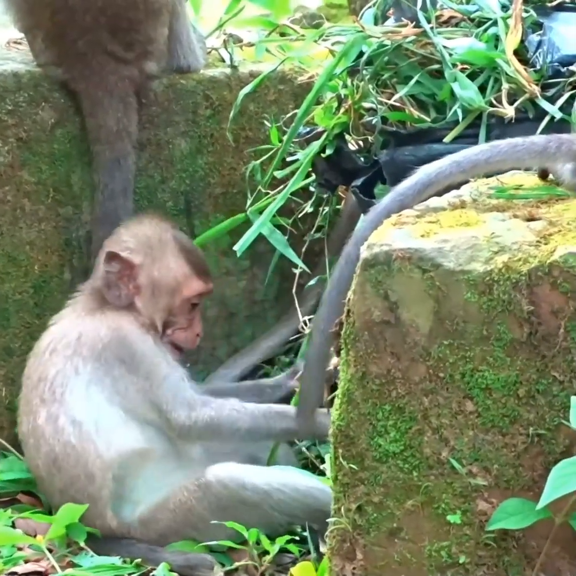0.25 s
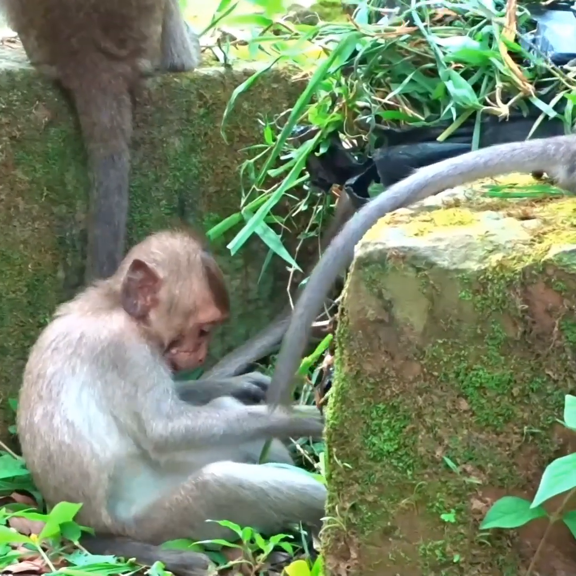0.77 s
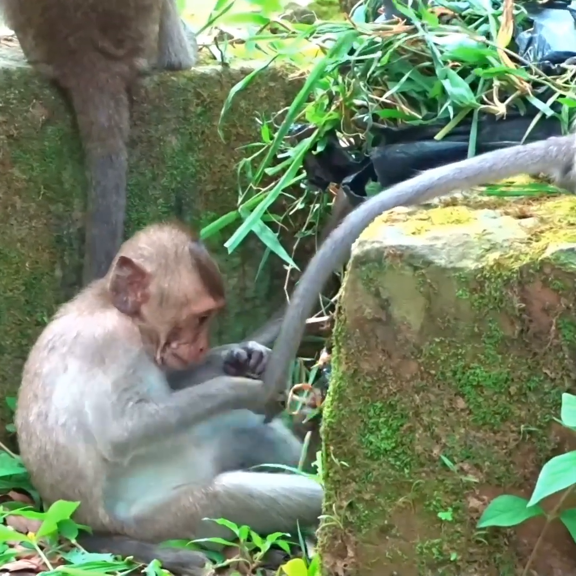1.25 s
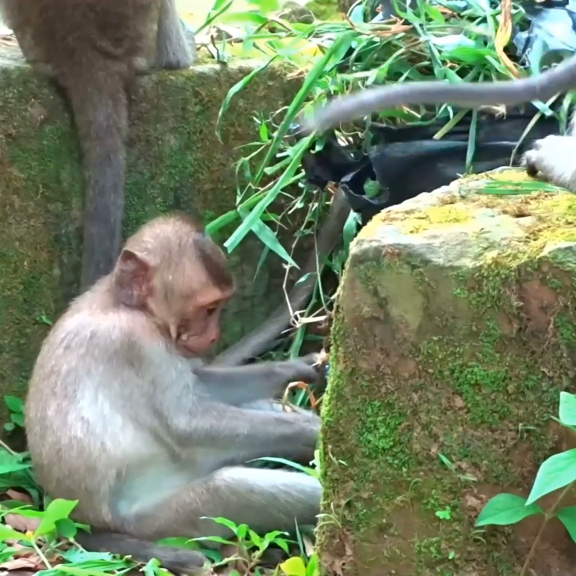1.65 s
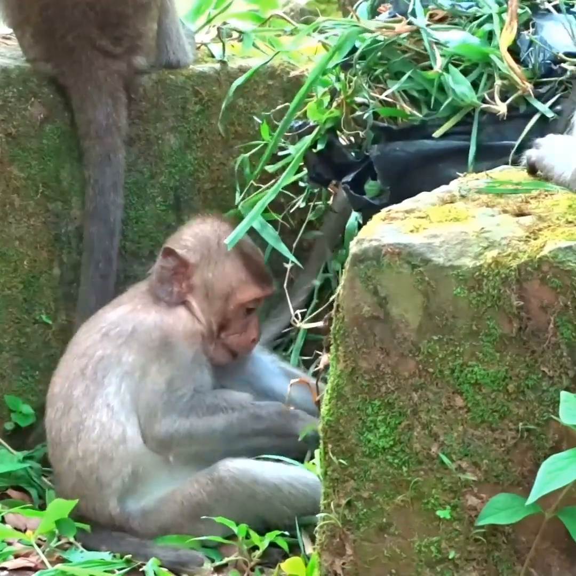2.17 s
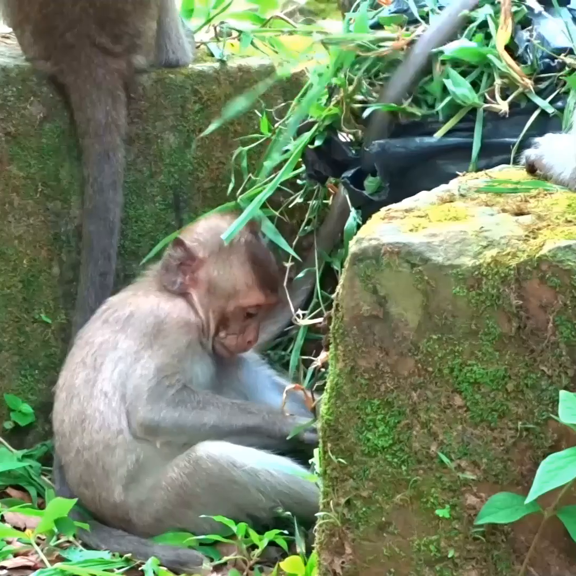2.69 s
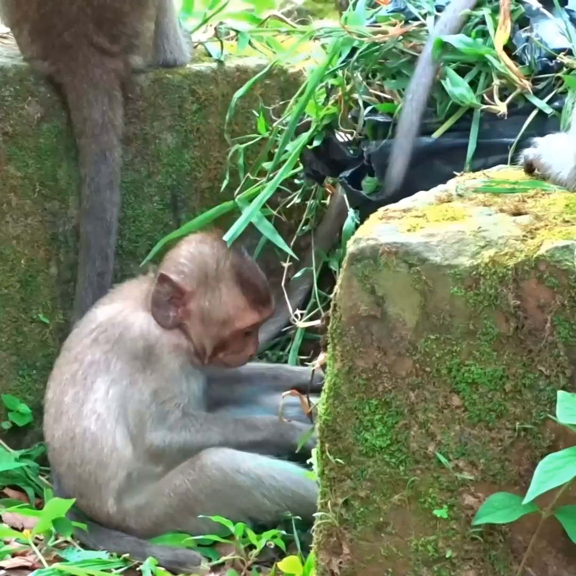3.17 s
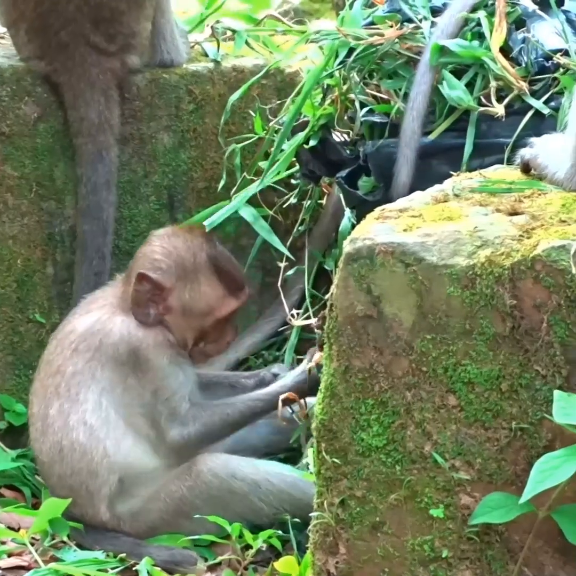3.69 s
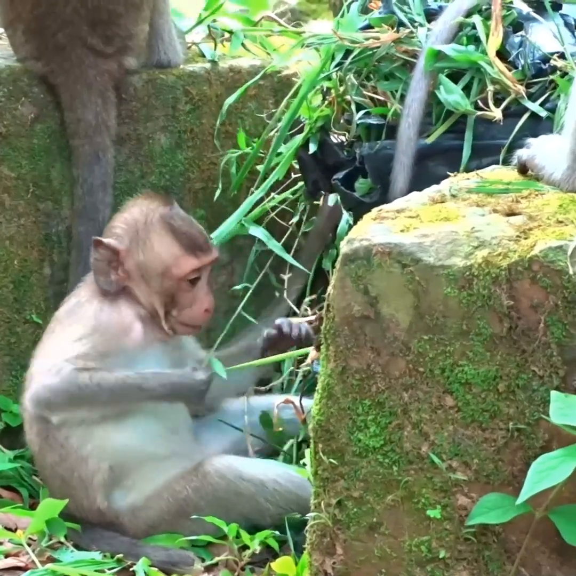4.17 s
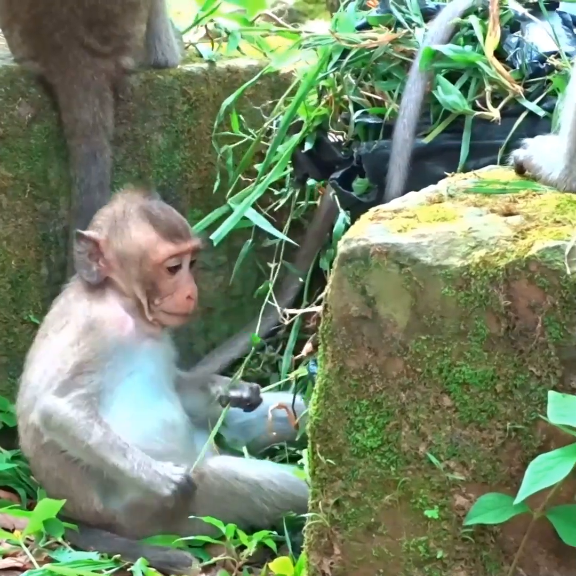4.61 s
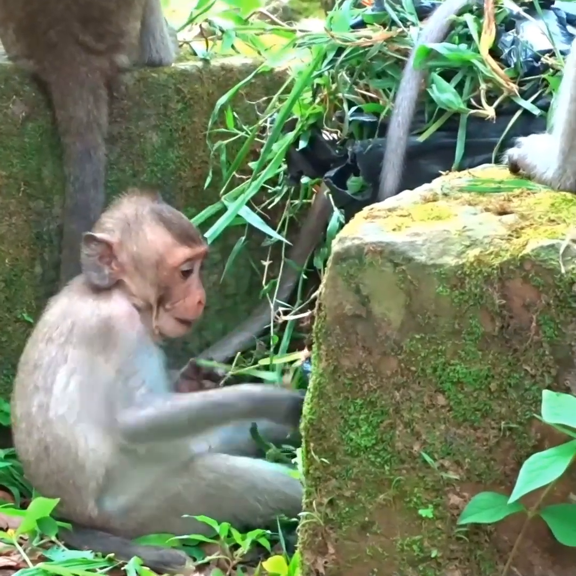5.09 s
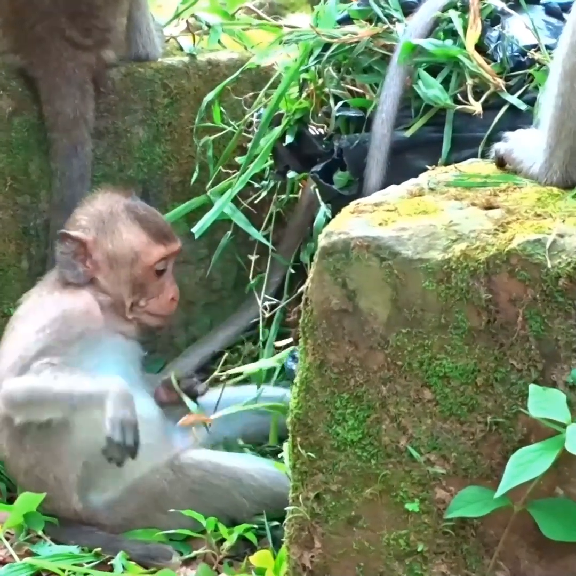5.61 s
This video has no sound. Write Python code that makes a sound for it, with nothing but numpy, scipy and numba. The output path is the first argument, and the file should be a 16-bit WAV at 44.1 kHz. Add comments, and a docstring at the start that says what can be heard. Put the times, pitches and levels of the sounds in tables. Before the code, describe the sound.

A young monkey screeches outdoors, a few metres away and slightly right of centre, with a short echo from stone walls and trees. A steady low, wind-like rumble and a faint hush run throughout. A brief raspy squeal comes right at the start, then a pause with two tiny twig ticks near 0.8 seconds. A softer, lower squeal follows at 1 second. From 1.3 seconds harsh, very high screeches come in quick succession, hissy and sometimes locking into a thin whistle, peaking around 2 seconds. A longer screech trails off from 2.5 to 3 seconds, followed by two short squeaks. Two more long, loud screeches start at about 3.4 and 4 seconds, each fading away. Faint twig snaps fall around 2.8, 3.4 and 4.9 seconds. Weaker, raspier cries come at 5 and 5.4 seconds, with a last small one near 5.8 seconds.

```python
"""Young monkeys screeching among stone walls

Bouts of screeches come from a few metres away, outdoors. Each is chaotic vocal-fold noise in two
gliding mouth resonances, with rasp and breath hiss; now and then the folds lock into a thin squeal.
Walls and trees echo, twigs tick, and a low rumble with a faint drone lies underneath."""
import sys
import numpy as np
from scipy import signal
from scipy.fft import rfft, irfft
from scipy.io import wavfile
from numba import njit

SR = 44100
rng = np.random.default_rng(int(sys.argv[2]) if len(sys.argv) > 2 else 0)


def wrap_up_sound(samples):
    """Save the sound to the file named by the first command line argument, as 16-bit audio."""
    columns = np.atleast_2d(samples).T
    # keep every value between -1 and 1, then stretch to whole-number steps
    tamed = np.clip(columns, -1, 1)
    steps = np.round(tamed * 32767).astype(np.int16)
    wavfile.write(sys.argv[1], SR, steps)


N = 257984
TIME, FREQS = np.arange(N) / SR, np.fft.rfftfreq(N, 1 / SR)
CUTOFF_HZ = 15850

# How the throat colours a locked pitch and its harmonics: f/Hz, gain/dB
THROAT_COLOUR = [(1500, -23), (2500, -13), (3800, -1.5), (5300, -1), (7500, -1), (10500, -23), (15000, -41)]


def from_db(db):
    return 10 ** (np.asarray(db) / 20)


def unit_rms(x):
    return x / np.sqrt(np.mean(x ** 2) + 1e-20)


def at_hz(curve, hz):
    """Read a curve along a logarithmic frequency axis."""
    freqs, values = np.transpose(curve)
    return np.interp(np.log(np.maximum(hz, 1)), np.log(freqs), values)


def noise(colour):
    """Coloured noise; rms 1."""
    return unit_rms(irfft(rfft(rng.standard_normal(N)) * from_db(at_hz(colour, FREQS)), N))


def drift(rate_hz):
    """Smooth random motion; rms 1."""
    return unit_rms(irfft(rfft(rng.standard_normal(N)) / (1 + (FREQS / rate_hz) ** 2), N))


def stereo(mid, side, likeness):
    """Two unrelated signals become a partly alike pair."""
    return np.sqrt((1 + likeness) / 2) * mid + np.sqrt((1 - likeness) / 2) * np.array([side, -side])


def wide_noise(colour):
    """Coloured noise, centred in the bass and wide above it."""
    # Stereo image: f/Hz, left-right likeness
    likeness = [(40, .999), (100, .99), (200, 0.96), (380, 0.48), (1000, 0.55)]
    return irfft(stereo(rfft(noise(colour)), rfft(noise(colour)), at_hz(likeness, FREQS)), N)


def drone(trim_db, waver):
    """Two faint low tones, each wavering in pitch."""
    # Drone tones: f/Hz, level/dB
    tones = [(48.4, -48.5), (75.4, -48)]
    out = np.zeros(N)
    for hz, db in tones:
        phase = 2 * np.pi * np.cumsum(hz * (1 + waver * drift(4.6))) / SR
        out += from_db(db + trim_db) * np.sqrt(2) * np.sin(phase)
    return out


def rumble(level_db):
    """A steady bed of deep noise."""
    # Rumble spectrum: f/Hz, density/dB
    colour = [(12, -33), (24, -24), (36, 2.5), (50, -1.5), (61, -10.5), (82, -3.5), (95, 1.5), (135, -1),
              (170, -9), (220, -17.5), (300, -27), (600, -52), (2500, -89)]
    return from_db(level_db) * wide_noise(colour)


def open_air(level_db, swell_depth):
    """The hush of open air, gently rising and falling."""
    # Hush spectrum: f/Hz, density/dB
    colour = [(150, -4), (300, 0.5), (600, 1), (1000, -4), (1600, -8.5), (3000, -11), (5000, -17.5),
              (8000, -14), (11000, -25.5), (15500, -29.5)]
    # Swell shape, scaled about its mean by swell_depth: t/s, level/dB
    swell = [(0.0, -42), (0.01, -52), (0.18, -54.5), (1.34, -59), (1.53, -49.5), (2.61, -57), (5.82, -55),
             (5.85, -46)]
    swell_db = np.interp(TIME, *np.transpose(swell))
    return from_db(level_db + swell_depth * (swell_db - swell_db.mean())) * wide_noise(colour)


def call_window(start, length, attack_s, release_s):
    """The samples that one call covers, its on-off gate and the time since it began."""
    span = np.flatnonzero((TIME > start - attack_s / 2) & (TIME < start + length + release_s))
    t = TIME[span] - start
    gate = np.clip(t / attack_s + .5, 0, 1) * np.clip(1 - (t - length) / release_s, 0, 1)
    return span, gate, np.clip(t, 0, length)


def effort(t, swell_s, hold_s, swell_db, fade_db, fade_s=.053):
    """Vocal effort in dB relative to its peak: a steady swell, a hold, then a fall to a weaker level."""
    swell_left = np.clip(1 - t / swell_s, 0, 1)
    faded = 1 - np.exp(-np.maximum(t - swell_s - hold_s, 0) / fade_s)
    return -swell_db * swell_left - fade_db * faded


@njit
def gliding_bandpass(x, tuning, damping):
    """A two-pole band-pass whose centre and damping move."""
    out, band_state, low_state = np.zeros(len(x)), 0., 0.
    for i in range(len(x)):
        g = tuning[i]
        band = (band_state + g * (x[i] - low_state)) / (1 + g * (g + damping[i]))
        band_state = 2 * band - band_state
        low_state += 2 * g * band
        out[i] = band * damping[i]
    return out


def resonance(source, hz, width_hz):
    """A steep moving resonance that keeps the rms of white noise."""
    angle = 2 * np.pi * np.clip(hz, 100, .45 * SR) / SR * np.ones(len(source))
    damping = 2 * np.pi * width_hz / SR / np.sin(angle)
    for _ in range(3):
        source = gliding_bandpass(source, np.tan(angle / 2), damping)
    return source * np.sqrt(SR / (3 * np.pi / 4 * width_hz))


def half_locked(folds, hz, width_hz, stray, grip, octave_db=-7.5):
    """As the folds grip, noise in a resonance gives way to a tone that strays inside it, plus an octave."""
    pitch = hz + stray * width_hz
    phase = 2 * np.pi * np.cumsum(pitch) / SR
    throat_db = np.minimum(at_hz(THROAT_COLOUR, 2 * pitch) - at_hz(THROAT_COLOUR, pitch), 0)
    octave = from_db(octave_db + throat_db) * (2 * pitch < CUTOFF_HZ)
    tone = np.sqrt(2) * (np.sin(phase) + octave * np.sin(2 * phase))
    return np.sqrt(1 - grip) * resonance(folds, hz, width_hz) + np.sqrt(grip) * tone


def breath_hiss(bands, flicker_db, flicker_hz):
    """Air past the teeth, each band flickering on its own; rms 1."""
    # Hiss spectrum: f/Hz, density/dB
    colour = [(1500, -40), (2500, -42), (4500, -6), (7000, 2.5), (10000, 1.5), (12000, -6), (15500, -11.5)]
    out, air = np.zeros(N), rfft(noise(colour))
    centres = np.linspace(3000, CUTOFF_HZ, bands)
    for share in np.eye(bands):
        band = irfft(air * np.interp(FREQS, centres, share), N)
        out += band * from_db(flicker_db * drift(flicker_hz))
    return unit_rms(out)


def screeches(flutter_db, flutter_hz, surge_db, wander, wander_hz, trim_db):
    """Chaotic folds drive the mouth in uneven bursts, catching on a pitch for milliseconds at a time."""
    # Screeches that swell, hold and trail off: t/s, length/s, swell/s, hold/s, level/dB, swell/dB,
    # fade/dB, lower resonance/Hz, upper resonance/Hz, width/Hz, upper/dB re level, rasp/dB re level,
    # hiss/dB, swoop/share, sag/share
    calls = [ (0.053, 0.23, .004, .01, -44.5, 0, 12, 2905, 5850, 2400, -2.5, 0, -66, 0.015, .17),
             (1.029, 0.26, 0.091, 0.087, -59, 9, 2, 1760, 6380, 2800, 6, 1, -62.5, 0.18, 0.0062),
             (1.321, 0.21, 0.064, 0.047, -35, 5.5, 5.5, 4510, 7070, 2282, 1, -11.5, -50, .04, 0),
             (1.587, .17, 0.037, 0.054, -33.5, 4.5, 3.5, 4716, 6835, 2398, -2, -8, -45.5, .08, .3),
             (1.9, 0.18, 0.089, 0.044, -26.5, 22.5, 3.5, 4663, 7030, 2578, 0, -19, -40.5, 0.41, 0.16),
             (2.218, 0.15, 0.041, .055, -27, 19.5, 10.5, 4640, 7170, 2487, -4, -16, -36, 0.63, 0.046),
             (2.518, 0.5, 0.074, .05, -32.5, 10.5, 28, 4770, 7490, 2595, .5, -22.5, -39, 0, 0.026),
             (2.996, .13, 0.023, .06, -44.5, 6, 0, 4770, 8100, 2114, -1, -34, -37.5, 0.34, 0.019),
             (3.221, 0.054, 0.023, .022, -31, 6.5, 6, 4990, 6070, 2860, -2, -22, -34, .32, 0.1),
             (3.435, 0.43, .066, 0.054, -27.5, 23.5, 19, 4820, 7520, 3200, -3, -23, -37, 0.15, 0),
             (3.963, 0.57, 0.0419, 0.11, -28.5, 14, 15.5, 4647, 7680, 2946, -3.5, -22.5, -40, .07, 0.011),
             (4.556, 0.11, 0.052, 0.025, -39, 5, 13, 4740, 7250, 2204, 7.5, -22, -39, 0.097, 0.056),
             (4.959, .25, .085, 0.045, -33.5, 16, 3, 4660, 7520, 2910, 0.5, -11, -43, .18, .17),
             (5.409, .27, .07, .055, -38, 7, 16.5, 3146, 6280, 3300, 2.5, -29, -59, .03, .24),
             (5.788, 0.064, 0.053, .01, -43, 10, 0, 2830, 6940, 2800, 4.5, -12, -56, 0.059, 0.061)]
    swoop_s, sag_s, hiss_rise_s = .051, .043, .011
    press_per_db = .002   # the lower resonance rises as the voice thins
    out, hiss = np.zeros(N), breath_hiss(bands=10, flicker_db=4, flicker_hz=35)
    bursts = unit_rms(from_db(flutter_db * np.tanh(drift(flutter_hz)) + surge_db * drift(17)))
    # Row 0 moves the lower resonance, row 1 the upper.
    tremble = 1 + wander * np.array([drift(wander_hz), drift(wander_hz)])
    stray = np.array([.36 * np.tanh(drift(55.05)) + .0407 * drift(603) for _ in range(2)])
    grip = np.array([np.clip(.23 + .36 * drift(44), 0, .9) for _ in range(2)])   # pitched share of power
    folds = rng.standard_normal((3, N))
    for (start, length, swell_s, hold_s, db, swell_db, fade_db, lower_hz, upper_hz, width_hz,
         upper_db, rasp_db, hiss_db, swoop, sag) in calls:
        span, gate, t = call_window(start, length, attack_s=.016, release_s=.021)
        effort_db = effort(t, swell_s, hold_s, swell_db, fade_db)
        opening = np.exp(-(t / swoop_s) ** 2)   # the upper resonance swoops down as the mouth opens
        closing = np.exp((t - length) / sag_s)   # at the end the voice sags into a rasp
        lower_glide = lower_hz * (1 - sag * closing - press_per_db * effort_db) * tremble[0, span]
        upper_glide = upper_hz * (1 + swoop * opening - .4 * sag * closing) * tremble[1, span]
        lower = half_locked(folds[0, span], lower_glide, width_hz, stray[0, span], grip[0, span])
        upper = half_locked(folds[1, span], upper_glide, 1.25 * width_hz, stray[1, span], grip[1, span])
        upper *= from_db(upper_db - 1.5 * closing)
        rasp = from_db(rasp_db + 5.5 * closing) * resonance(folds[2, span], hz=2690, width_hz=1450)
        voice = from_db(db + effort_db) * (lower + upper + rasp)
        airflow = 1 - np.exp(-t / hiss_rise_s)   # the hiss builds after the voice starts
        breath = from_db(hiss_db + .046 * effort_db - 16 * closing) * airflow * hiss[span]
        out[span] += gate * bursts[span] * (voice + breath)
    return from_db(trim_db) * out


def squeals(shimmer_db, trim_db, harmonics):
    """The folds lock on one shaky pitch that glides and settles; the throat colours its harmonics."""
    # Squeals: t/s, length/s, first pitch/Hz, last pitch/Hz, level/dB, fade/dB, overtones/dB, jitter/share
    calls = [ (0.056, 0.032, 3940, 3760, -47, 7, -7, .02), (0.081, 0.18, 2318, 2260, -37, 0, -33, 0.016),
             (1.091, .12, 1680, 1635, -34, 5, -36, 0.025), (1.078, .155, 5490, 5620, -55.5, 2, -20, .013),
             (1.101, .12, 2420, 2390, -34.5, 17, -36, 0.031), (1.322, 0.031, 3750, 3850, -42, 2, -12, .02),
             (1.336, 0.071, 2477, 2424, -36, 2, -15, 0.0206), (1.355, .03, 6850, 6950, -33.5, 3, -20, .011),
             (1.409, 0.052, 3866, 3876, -34.5, -5, -10, 0.027),
             (1.62, .02, 6910, 6810, -30, 9, -18, 0.0055), (1.661, .045, 2720, 2378, -26, 5, -1.5, 0.0072),
             (1.707, .035, 4500, 2755, -30, -2, -10, 0.0176),
             (1.954, .03, 10200, 8830, -17.5, 5, -13, .035), (1.99, 0.05, 7950, 7880, -20, 13, -19, .018),
             (2.072, 0.0094, 3920, 3750, -23.5, 2, -16, 0.013),
             (2.24, 0.015, 10320, 9000, -23, 14, -17, .02), (2.289, 0.055, 4460, 4550, -31, -1, -13, 0.049),
             (2.563, 0.0282, 4520, 4320, -28, 0, -16, 0.036),
             (2.748, 0.045, 9700, 10540, -20.5, -1, -15, 0.018),
             (2.912, 0.011, 4800, 4600, -31.5, 10, -15, 0.029),
             (2.99, .037, 10800, 10500, -23, 6, -15, .022), (3.272, 0.013, 4700, 3810, -33, 12, -8, 0.0064),
             (3.425, 0.0161, 2550, 4170, -24.5, 5.5, -15.5, 0.014),
             (3.476, 0.069, 4830, 4426, -27, 1, -19, 0.0496),
             (3.935, 0.018, 2890, 4000, -28, 0.5, -14, 0.014),
             (3.983, 0.016, 8270, 7950, -27.5, -2, -2, 0.011),
             (4.002, 0.038, 3405, 3590, -33, 4, -4, 0.058), (4.086, 0.12, 7820, 8040, -26.5, 9, -17, 0.022),
             (4.237, 0.32, 4640, 4857, -39, 8, 12.5, .022), (4.939, 0.0787, 2470, 2570, -41.5, 5, -18, .02),
             (4.947, 0.0405, 3400, 3730, -39, 1, -14, 0.028),
             (5.107, .035, 4950, 4760, -36, -6, -15, 0.027),
             (5.221, .045, 4200, 4100, -37.5, -1, -19, 0.021),
             (5.501, 0.083, 3057, 3257, -36, -2, -6, 0.027)]
    out, shimmer = np.zeros(N), from_db(shimmer_db * drift(74))
    shake = drift(70) + .7 * drift(450)
    for start, length, first_hz, last_hz, db, fade_db, overtone_db, jitter in calls:
        span, gate, t = call_window(start, length, attack_s=.003, release_s=.003)
        pitch = last_hz + (first_hz - last_hz) * (1 - t / length) ** 1.3   # fastest at the start
        phase = 2 * np.pi * np.cumsum(pitch * (1 + jitter * shake[span])) / SR
        envelope = gate * shimmer[span] * from_db(db + trim_db - fade_db * t / length)
        for k in range(1, harmonics + 1):
            colour = from_db(at_hz(THROAT_COLOUR, k * pitch) + overtone_db * (k > 1))
            out[span] += np.sqrt(2) * envelope * colour * (k * pitch < CUTOFF_HZ) * np.sin(k * phase)
    return out


def fine_colour(x):
    """Fixed narrow peaks and dips give the calls and snaps a slightly ringing colour."""
    # Peaks and dips: f/Hz, width/Hz, gain/dB
    bands = [(3600, 96, -2.5), (4950, 89, -2), (6370, 150, -12), (5980, 550, 2.5), (6900, 220, 0.5),
             (7130, 102, 3.5), (7840, 47, -0.5), (9000, 840, 3.5), (10320, 610, 3.5), (10600, 410, -0.5),
             (12400, 840, 2.5), (14300, 600, 2.5)]
    for hz, width_hz, db in bands:
        band = signal.lfilter(*signal.iirpeak(hz, hz / width_hz, fs=SR), x)
        x = x + (from_db(db) - 1) * band
    return x


def walls_and_trees(x, tail_db, build_s):
    """A few wall echoes and a diffuse tail from trees and stone, whose treble dies first."""
    # Wall echoes: delay/s, level/dB, right-ear lag/s
    echoes = [(.011, -7, 0.0032), (.034, -21, -0.0066), (.071, -8, .00003)]
    # Time the tail takes to fall 60 dB: f/Hz, decay/s
    tail_t60 = [(1000, 2.1), (2500, 1.64), (4500, 1.04), (7500, 0.88), (13000, 1.27)]
    # Stereo image of the tail: f/Hz, left-right likeness
    tail_likeness = [(1000, 0.21), (2500, 0.88), (4000, 0.93), (8000, 1), (9700, 0.4), (12000, 0.42),
                     (15000, 1)]
    t = TIME[:SR * 3 // 2]
    hz, tail = np.fft.rfftfreq(len(t), 1 / SR), 0
    white = stereo(*rfft(rng.standard_normal((2, len(t)))), at_hz(tail_likeness, hz))
    centres = np.geomspace(1000, 16000, 9)
    for centre, share in zip(centres, np.eye(len(centres))):
        band = irfft(white * np.interp(hz, centres, share), len(t))
        envelope = from_db(-60 * t / at_hz(tail_t60, centre)) * np.minimum(t / build_s, 1)
        tail = tail + band * envelope / np.linalg.norm(envelope)
    response = from_db(tail_db) * tail
    for delay, db, lag in echoes:
        response[0, round(delay * SR)] += from_db(db)
        response[1, round(delay * SR) + round(lag * SR)] += from_db(db)
    return signal.fftconvolve(x[None], response, axes=1)[:, :N]


def twigs(t60_s):
    """Small dry snaps: bursts of noise that die at once."""
    # Snaps: t/s, level/dB
    snaps = [(.812, -53), (.864, -47.5), (2.763, -40), (2.856, -43), (2.881, -43), (3.325, -39),
             (3.529, -40), (4.869, -41.5)]
    # Snap spectrum: f/Hz, density/dB
    colour = [(200, -11), (700, 1), (1500, 1.5), (2600, 4), (5000, -2), (9000, -5.5), (15000, -23)]
    envelope = np.zeros(N)
    for start, db in snaps:
        envelope += from_db(db - 60 * np.clip((TIME - start) / t60_s, 0, 2)) * (TIME >= start)
    return envelope * noise(colour)


def scene():
    """Monkeys and twigs echo a little right of centre, over the outdoor bed."""
    # Where the callers are: t/s, left minus right/dB
    pan = [(0, -3), (3.8, -3), (4.7, -0.3), (5.8, -1.8)]
    voices = screeches(flutter_db=1.5, flutter_hz=224, surge_db=.97,
                       wander=.02007, wander_hz=71.4, trim_db=.61)
    voices += squeals(shimmer_db=1.5, trim_db=-.76, harmonics=4)
    near = fine_colour(voices + twigs(t60_s=.032))
    echoing = near + walls_and_trees(near, tail_db=-.33, build_s=.019)
    pan_db = np.interp(TIME, *np.transpose(pan))
    bed = drone(trim_db=.5, waver=.0088) + rumble(level_db=-38.5) + open_air(level_db=-52, swell_depth=.61)
    return echoing * from_db(np.array([pan_db, -pan_db]) / 2) + bed


def record(dry):
    """A steep low-pass cuts the very top."""
    return signal.sosfilt(signal.ellip(12, .2, 90, CUTOFF_HZ, fs=SR, output="sos"), dry)


dry = scene()
out = record(dry)
wrap_up_sound(out)
```